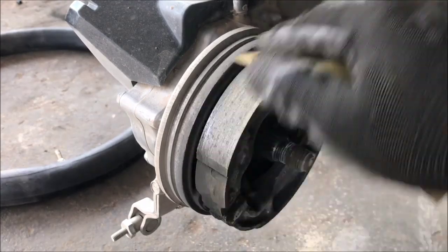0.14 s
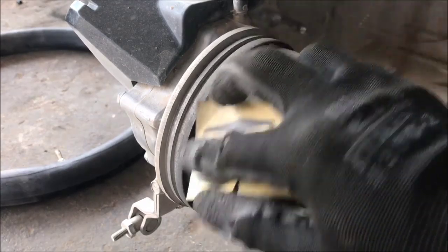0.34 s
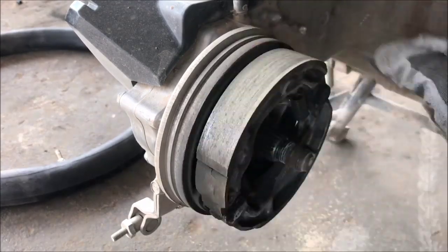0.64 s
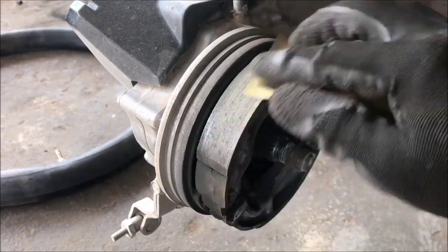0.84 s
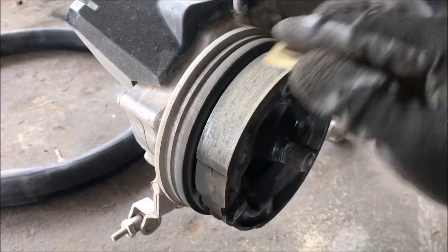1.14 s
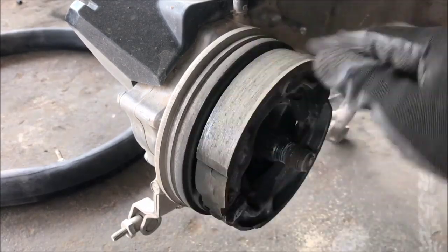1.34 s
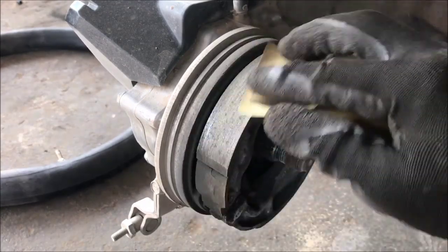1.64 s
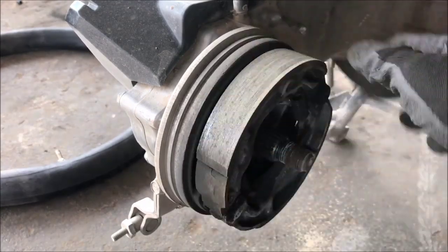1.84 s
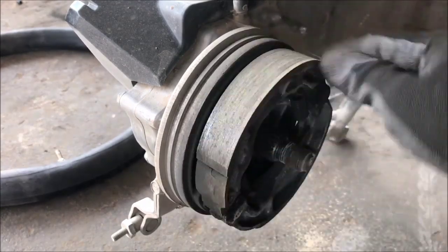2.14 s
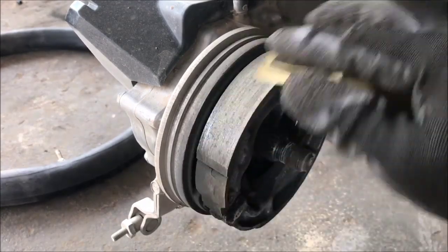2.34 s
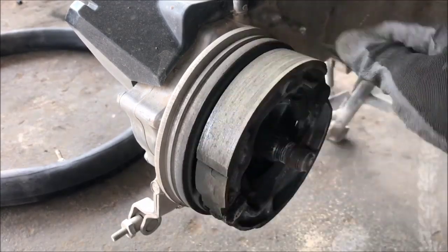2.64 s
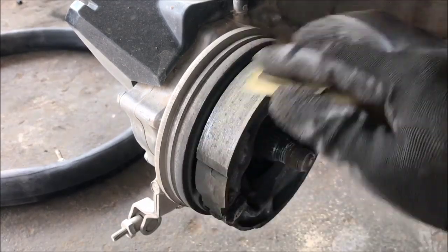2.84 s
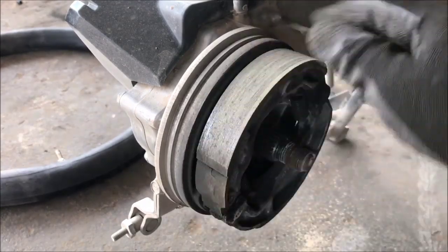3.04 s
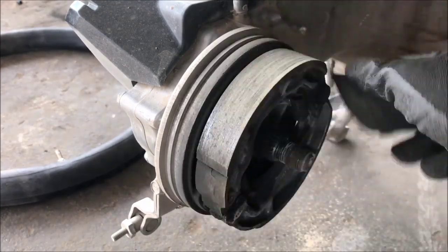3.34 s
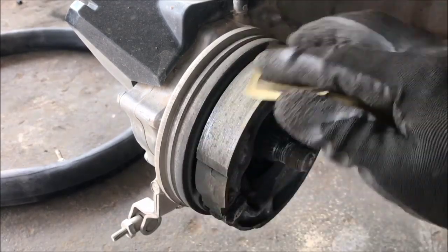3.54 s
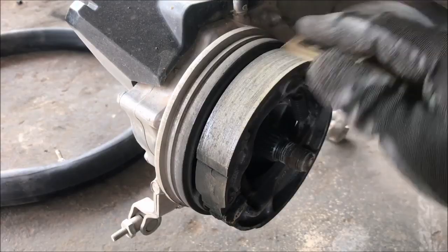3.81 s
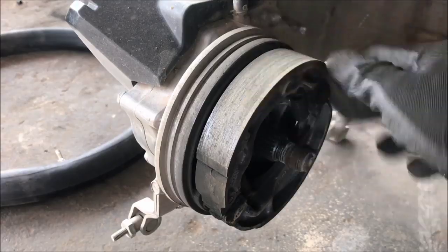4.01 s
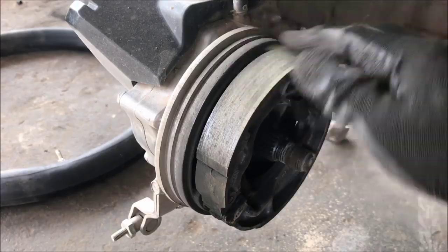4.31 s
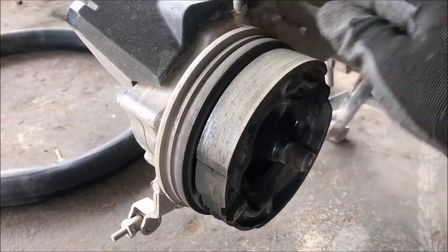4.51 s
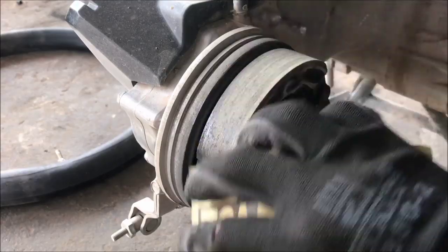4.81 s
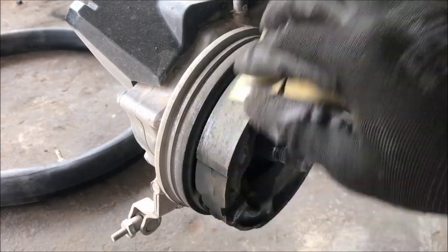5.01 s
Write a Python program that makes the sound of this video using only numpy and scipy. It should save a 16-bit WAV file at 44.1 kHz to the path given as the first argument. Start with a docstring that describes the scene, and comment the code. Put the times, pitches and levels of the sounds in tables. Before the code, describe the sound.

Close to the microphone, sandpaper rubs a brake lining in short, dry, bright strokes, about two or three a second. Most start with a papery tick, and some make the metal shoe knock lightly. The workshop adds a faint echo. Between strokes a small bird chirps now and then, over a distant engine idle and soft traffic.

```python
"""In an echoing workshop, a gloved hand rubs sandpaper over a drum brake shoe in quick strokes, close up.
Random grit cuts, split into scrape, rasp and hiss, follow the push of each stroke; most strokes land with a
tick of filtered noise. Decaying sines make the shoe knock where the paper catches and the plate thud.
A small bird chirps as a gliding sine, heard mostly by its echo. Behind lie a distant engine idle, of
two sines and a noisy exhaust boom, and coloured noise for traffic through the open door."""
import sys
import numpy as np
from scipy import signal
from scipy.fft import rfft, irfft, next_fast_len
from scipy.io import wavfile
from scipy.ndimage import uniform_filter1d, map_coordinates

SR = 44100
rng = np.random.default_rng(int(sys.argv[2]) if len(sys.argv) > 2 else 0)


def file_out(sig):
    """Save sig as 16-bit WAV at sys.argv[1]."""
    # one column per channel
    cols = np.atleast_2d(sig).T
    # limit, then scale
    lim = np.clip(cols, -1, 1)
    pcm = np.round(lim * 32767).astype(np.int16)
    wavfile.write(sys.argv[1], SR, pcm)


N = 227545
TOP_HZ = 15900  # upper band limit of the hiss and of the microphone


def amp(db):
    """Decibels to linear gain."""
    return 10 ** (np.asarray(db) / 20)


def unit(x):
    """Scale to an rms of 1."""
    return x / np.sqrt(np.mean(x ** 2) + 1e-20)


def along(points, hz):
    """Read a curve of (pitch, value) points on a log frequency axis."""
    point_hz, values = np.transpose(points)
    return np.interp(np.log(hz + 1), np.log(point_hz + 1), values)


def curves(rows):
    """One value per sample for each column after the time."""
    times_s, *columns = np.transpose(rows)
    return [np.interp(np.arange(N) / SR, times_s, column) for column in columns]


def wobble(rate):
    """A smooth random curve with `rate` knots a second."""
    knots = rng.standard_normal(int(N * rate / SR) + 4)
    return map_coordinates(knots, [np.arange(N) * rate / SR])


def filtered(x, response):
    """Shape the spectrum of x by a function of frequency."""
    size = next_fast_len(N + SR // 2)
    hz = np.fft.rfftfreq(size, 1 / SR)
    return irfft(rfft(x, size) * response(hz), size)[:N]


def below(hz, edge, order=12):
    """Gain of a low-pass without phase shift."""
    return 1 / (1 + (hz / edge) ** order)


def resonance(modes, f):
    """Summed response of damped modes (pitch_hz, width_hz, level_db) at the frequencies f."""
    return sum(amp(db) * 1j * f * w / (hz * hz - f * f + 1j * f * w) for hz, w, db in modes)


def noise(spectrum):
    """Noise of rms 1 with the given colour."""
    return unit(filtered(rng.standard_normal(N), lambda hz: amp(along(spectrum, hz))))


def patchy(x, depth_db):
    """Narrow peaks of colour come and go at random."""
    bins = signal.stft(x, nperseg=1024)[2]
    field = uniform_filter1d(rng.standard_normal(bins.shape), size=3, axis=0)
    field = uniform_filter1d(field, size=7, axis=1)
    return signal.istft(bins * amp(depth_db * unit(field)), nperseg=1024)[1][:N]


def add(track, s, sound):
    """Lay a sound into the track at s seconds."""
    start = int(np.clip(round(s * SR), 0, N))
    track[start:start + len(sound)] += sound[:N - start]


def sanding(cuts_per_s=12000, dust=0.98, judder_db=0.8, chatter_db=1.5, catch_db=2.5, rasp_db=-0.5, scrape_db=-1):
    """Thousands of tiny cuts; speed makes them hiss, pressure drives the paper and the shoe."""
    # strokes, with levels ahead of the band trims: start_s, length_s, touchdown_db, rise_s, push_db,
    # second_surge_s (from the start), surge_db, brightness_db, rasp_db (paper), scrape_db (shoe),
    # mid_scrape_cut_db (negative swells), edge_flare_db
    stroke_rows = [ (0.0, 0.081, -32, .015, -29.5, 0.038, -26, -6, -34.5, -48, 8, 8),
                   (0.237, 0.19, -35, 0.034, -23, .105, -21, -2.5, -31, -41, 6, -1),
                   (0.426, 0.22, -72, 0.098, -25.5, .181, -22.5, .5, -31, -40, 18, 2.5),
                   (0.935, 0.13, -45, 0.023, -28, 0.12, -19, -2.5, -32, -41.5, 28, 10),
                   (1.3574, 0.15, -38, 0.019, -26.5, 0.11, -24.5, -3.5, -30.5, -39, 13, 4),
                   (1.738, 0.16, -50, 0.021, -27, 0.13, -23, -2, -29, -37, 12, 1.5),
                   (2.138, .158, -46, 0.022, -26, 0.13, -24, 0, -30.5, -37.5, 15, 3),
                   (2.517, 0.19, -54, 0.055, -26, 0.13, -23.5, -0.5, -30, -36.5, 13, -4.5),
                   (2.906, 0.16, -57, 0.049, -21, 0.12, -23, 1, -28.5, -38.5, 6.5, 1),
                   (3.285, 0.16, -37, .019, -22.5, 0.11, -23, -1, -30, -42.5, .5, 0.5),
                   (3.637, .16, -42, 0.036, -21.5, 0.095, -22.5, 1.5, -28.5, -40.5, 3, 1.5),
                   (4.013, 0.17, -50, 0.055, -20.5, 0.078, -22, 1, -30.5, -46, -6, 11.5),
                   (4.399, 0.15, -34, 0.022, -19.5, 0.046, -18.5, -.5, -27, -39, 4, 3.5),
                   (4.724, 0.21, -41, 0.091, -20.5, 0.092, -18.5, -3, -30.5, -40, 0.5, 2),
                   (5.143, .15, -58, 0.041, -29.5, .115, -23, -8.5, -35, -44, 5, 2)]
    # colour of grit on the lining: pitch_hz, level_db (per Hz, relative)
    grit_colour = [(200, -24), (560, -31), (850, -13), (1600, -19.5), (2100, -10.5), (2700, -4), (3600, -3),
                   (4400, 3), (5100, -1.5), (6600, 2), (7700, -1.5), (9400, 3), (10500, -5), (11700, 2),
                   (15800, 0)]
    # steel and lining ringing under the grit: pitch_hz, width_hz, level_db
    grit_rings = [(2380, 25, -25), (3420, 82, 1.5), (3680, 470, -6), (4350, 150, -9), (5900, 97, -8),
                  (6190, 160, -17), (8550, 220, -7.5)]
    # crossovers, scrape to rasp and rasp to hiss: edge_hz
    split_hz = (2200, 6000)
    sizzle_hz = 10500  # parts the top of the hiss, for brightness

    cuts = (rng.random(N) < cuts_per_s / SR) * rng.standard_normal(N)
    grit = unit(cuts) + dust * rng.standard_normal(N)
    grit = patchy(grit, depth_db=3.0)  # the sheet bends under the fingers
    grit = filtered(grit, lambda hz: amp(along(grit_colour, hz)) * (1 + resonance(grit_rings, hz)))

    scrape = unit(filtered(grit, lambda hz: below(hz, split_hz[0])))
    rasp = unit(filtered(grit, lambda hz: below(hz, split_hz[1]) - below(hz, split_hz[0])))
    hiss = unit(filtered(grit, lambda hz: (1 - below(hz, split_hz[1])) * (hz < TOP_HZ)))
    sizzle = filtered(hiss, lambda hz: 1 - below(hz, sizzle_hz))
    scrape = scrape * amp(catch_db * wobble(110) + scrape_db)  # coarse grains catch and let go
    rasp = rasp * amp(chatter_db * wobble(130) + rasp_db)

    gains = sum(stroke(*row) for row in stroke_rows)
    rubbing = np.sum(gains * [sizzle, hiss - sizzle, rasp, scrape], axis=0)
    return rubbing * amp(judder_db * wobble(160))


def stroke(start, length, land_db, rise, push_db, surge_s, surge_db, bright_db, rasp_db, scrape_db, cut_db, edge_db):
    """Gains of sizzle, lower hiss, rasp and scrape: a push, a sag, a second surge, then off over the edge."""
    sag_db, sag_at = 2.8, 0.4  # sag below the mean of push and surge; share of the way between them
    lift_s = 0.034  # the paper leaves the lining
    rasp_grows, scrape_grows = 0.48, 0.34  # dB for each dB of hiss
    cut_at, cut_width = 0.54, 0.12  # centre and width of the cut in scrape level, as shares of the stroke
    edge_s, edge_width_s = 0.025, 0.018  # drag over the lining's edge: time before the end, width
    edge_scrape = 1.05  # dB of scrape for each dB of that flare

    t = np.arange(N) / SR - start
    mean_db = (push_db + surge_db) / 2
    moments = np.sort([0, rise, rise + sag_at * (surge_s - rise), surge_s, length])
    heights = np.append(amp([land_db, push_db, mean_db - sag_db, surge_db]), 0)
    hiss = np.interp(t, moments, heights)
    effort = hiss / amp(mean_db)

    scrape_cut_db = cut_db * np.exp(-((t / length - cut_at) / cut_width) ** 2)
    flare_db = edge_db * np.exp(-((t - length + edge_s) / edge_width_s) ** 2)
    rasp = amp(rasp_db + flare_db) * effort ** rasp_grows
    scrape = amp(scrape_db - scrape_cut_db + edge_scrape * flare_db) * effort ** scrape_grows
    contact = (t >= 0) * np.clip((length - t) / lift_s, 0, 1)
    return contact * np.array([hiss * amp(bright_db / 2), hiss * amp(-bright_db / 2), rasp, scrape])


def ticks(t60=0.043, snap_t60=0.0047, gain_db=-6, tock_db=-12, tock_t60=0.017):
    """The stiff sheet snaps as it meets the lining, and its lowest mode rings for a moment."""
    # the paper lands or flicks: start_s, level_db (ahead of the gains)
    landings = [(0.239, -23), (0.7693, -23), (0.936, -14.5), (1.357, -21), (1.74, -16), (2.141, -10),
                (2.5185, -20), (2.91, -11), (3.188, -31), (3.282, -9), (3.6371, -18), (4.0149, -8.5),
                (4.3982, -17.5), (4.725, -34)]
    # modes of the folded sheet: pitch_hz, width_hz, level_db
    paper_modes = [(3800, 1300, -2.5), (6500, 2040, -11.5), (8640, 1000, -11.5), (13600, 3300, -21)]
    snaps, tocks = np.zeros(N), np.zeros(N)
    t = np.arange(SR // 20) / SR
    fade = amp(-60 * t / t60) + amp(-60 * t / snap_t60)
    lowest_mode = np.sin(2 * np.pi * paper_modes[0][0] * t)
    hardest_db = max(db for s, db in landings)
    for s, db in landings:
        add(snaps, s, amp(db + gain_db) * fade * rng.standard_normal(len(t)))
        ring_db = 2 * db - hardest_db + tock_db  # soft landings barely ring
        add(tocks, s, amp(ring_db - 60 * t / tock_t60) * lowest_mode)
    return tocks + filtered(snaps, lambda hz: resonance(paper_modes, hz))


def knocks(gain_db=-6, attack=0.00074):
    """The shoe, damped by its lining, rings briefly in several modes at each catch."""
    # the paper catches on the shoe: start_s, level_db (ahead of the gain)
    catches = [(1.045, -33), (1.478, -35), (1.742, -28.5), (1.864, -42), (2.166, -23.5), (2.282, -47),
               (2.521, -26.5), (2.667, -37), (3.034, -29), (3.283, -23.5), (3.401, -27), (3.745, -24)]
    # modes of the shoe: pitch_hz, level_db (varied a little at each catch), t60_s
    shoe_modes = [(855, -9.5, 0.08), (890, 5, 0.031), (1010, -5, 0.069), (1140, -26.5, 0.041),
                  (1304, -9, 0.096)]
    out, t = np.zeros(N), np.arange(SR // 10) / SR
    for s, db in catches:
        ring = np.zeros(len(t))
        for hz, mode_db, t60 in shoe_modes:
            fade = amp(mode_db + rng.normal(0, 0.63) - 60 * t / t60)
            ring += fade * np.sin(2 * np.pi * (hz * t + rng.random()))
        add(out, s, amp(db + gain_db) * ring * (1 - np.exp(-t / attack)))
    return out


def bumps(plate_hz=335, t60=0.057, attack=0.00086):
    """A soft push on the backing plate gives one low, short note."""
    # the heel of the hand bumps the plate: start_s, level_db (ahead of the fade)
    pushes = [(2.141, -28), (2.52, -29.5), (3.284, -32.5), (3.638, -33)]
    out, t = np.zeros(N), np.arange(SR // 5) / SR
    note = (1 - np.exp(-t / attack)) * np.sin(2 * np.pi * plate_hz * t)
    for s, db in pushes:
        add(out, s, amp(db - 60 * t / t60) * note)
    return out


def bird(trill_db=2, gain_db=-2, flutter=0.045):
    """A harsh, fluttering whistle that slides down through most of an octave."""
    # calls: start_s, level_db (ahead of the gain), tilt_db (per octave of pitch)
    chirp_rows = [(0.036, -31.5, -6), (0.72, -32, -6), (1.47, -42, -8), (2.719, -35, 4.5),
                  (3.528, -34, -2.5), (3.914, -33, 3)]
    # shape of one call: time_s, pitch_hz (centre of the flutter), level_db (relative)
    call_shape = [(0, 4600, -12), (.004, 4950, 4), (.009, 4750, -3), (.016, 4500, 1), (.022, 3500, -5),
                  (.034, 3300, -1), (.048, 2950, -6), (.07, 3200, -28)]
    out, size = np.zeros(N), int(call_shape[-1][0] * SR)
    glide_hz, shape_db = (curve[:size] for curve in curves(call_shape))
    octaves = np.log2(glide_hz / glide_hz.mean())
    for s, db, tilt_db in chirp_rows:
        pitch_hz = glide_hz * (1 + flutter * wobble(1100)[:size])
        level_db = db + gain_db + shape_db + tilt_db * octaves + trill_db * wobble(258)[:size]
        add(out, s, amp(level_db) * np.sin(2 * np.pi * np.cumsum(pitch_hz) / SR))
    return out


def engine(third_db=0.5, unsteady=0.016, waver_db=1.0, boom_db=-40.5):
    """A far idle: a low firing line, its third harmonic and the uneven boom of the exhaust."""
    # the idle settles a little lower: time_s, pitch_hz (ahead of the unsteadiness)
    firing_pitch = [(2.0, 59.07), (2.7, 57.95)]
    # level of the firing line: time_s, level_db (ahead of the waver)
    firing_level = [(0, -47), (1.2, -44), (2.9, -40.5), (3.8, -45), (5, -47)]
    # level of its third harmonic: time_s, level_db (ahead of the trim)
    drone_level = [(0.0, -43.5), (0.49, -55.5), (0.85, -41.5), (2.95, -41), (3.08, -55.5), (5.16, -54)]
    # colour of the exhaust in the yard: pitch_hz, level_db (per Hz, relative)
    boom_colour = [(30, -40), (44, -11), (54, -6.5), (70, -10), (80, -19.5), (88, -5), (94, -5.5), (102, 1),
                   (114, -7), (130, -24), (180, -54.5)]
    firing_hz = curves(firing_pitch)[0] * (1 + unsteady * wobble(14))
    phase = 2 * np.pi * np.cumsum(firing_hz) / SR
    firing = amp(curves(firing_level)[0] + waver_db * wobble(9.7)) * np.sin(phase)
    drone = amp(curves(drone_level)[0] + third_db) * np.sin(np.pi + 3 * phase)
    return firing + drone + amp(boom_db) * noise(boom_colour)


def street():
    """Distant traffic through the open door: soft noise with slowly changing colour and level."""
    # colour of the air: pitch_hz, level_db (per Hz, relative)
    air_colour = [(20, -14), (45, -4), (100, -1), (190, -4), (260, -6.5), (390, -9.5), (470, -16),
                  (700, -17.5), (1200, -20.5), (1600, -27.5), (2500, -30.5), (4700, -33), (6500, -37.5),
                  (15800, -61)]
    # level of the 200-700 Hz band: time_s, level_db
    street_level = [(0.0, -51.5), (0.24, -49), (0.59, -50), (1.35, -47.5), (5.16, -48.5)]
    air = patchy(noise(air_colour), depth_db=1.5)
    middle = filtered(air, lambda hz: (hz > 200) & (hz < 700))
    return air / np.std(middle) * amp(curves(street_level)[0])


def room(x, delay):
    """The workshop's echo: a noise tail, `delay` seconds late, that dies at its own rate in each band."""
    # decay of the workshop: pitch_hz, t60_s
    decay_times = [(200, 0.24), (1500, 0.55), (3500, 0.35), (7000, 0.32), (15000, 0.17)]
    hz, t, bins = signal.stft(rng.standard_normal(SR), SR, nperseg=256)
    fade = amp(-60 * t / along(decay_times, hz)[:, None])
    tail = signal.istft(bins * fade, SR, nperseg=256)[1]
    tail = np.pad(tail / np.linalg.norm(tail), (int(delay * SR), 0))
    return signal.fftconvolve(x, tail)[:N]


def scene():
    """Close work and its faint echo, the echoing bird, the engine and the street."""
    work = sanding() + ticks() + knocks() + bumps()
    call = bird()
    near = work + amp(-21.5) * room(work, delay=0.0039)
    far = call / 2 + amp(-1.5) * room(call, delay=0.001)  # the bird is heard mostly by its echo
    return near + far + engine() + street()


def record(dry):
    """The microphone drops the deepest rumble and keeps nothing above its band limit."""
    low_hz = 40
    return filtered(dry, lambda hz: below(hz, TOP_HZ, order=200) - below(hz, low_hz, order=4))


dry = scene()
out = record(dry)
file_out(out)
```